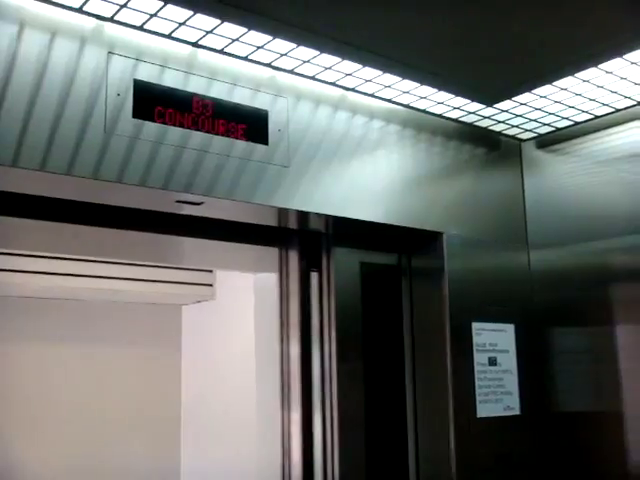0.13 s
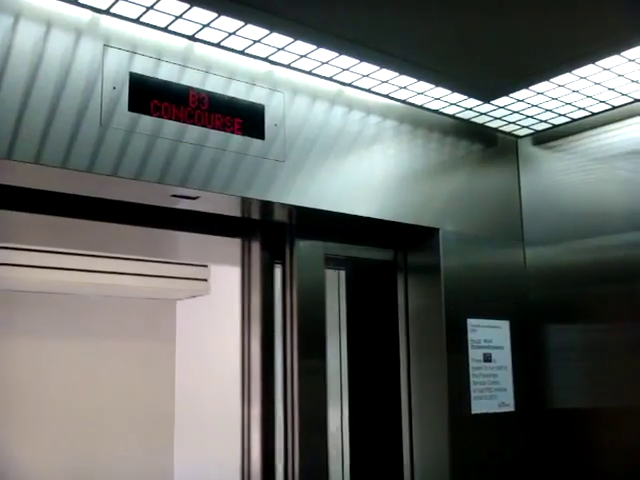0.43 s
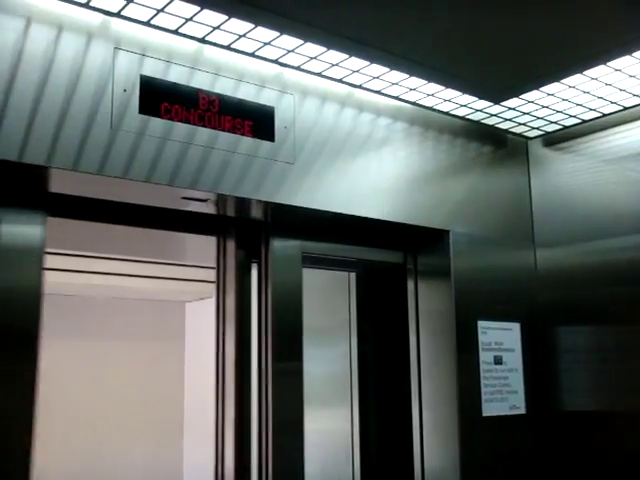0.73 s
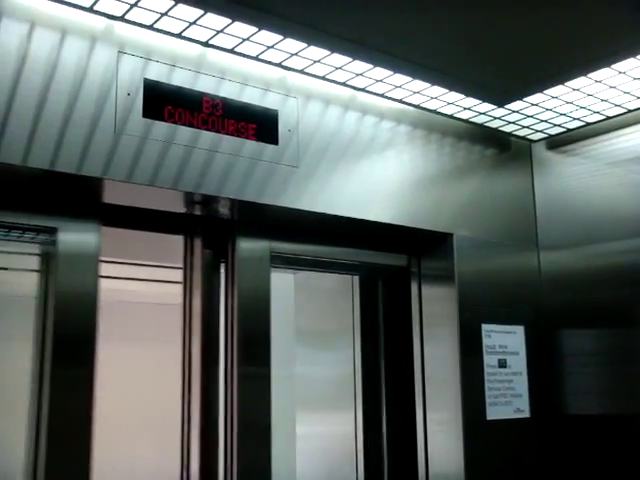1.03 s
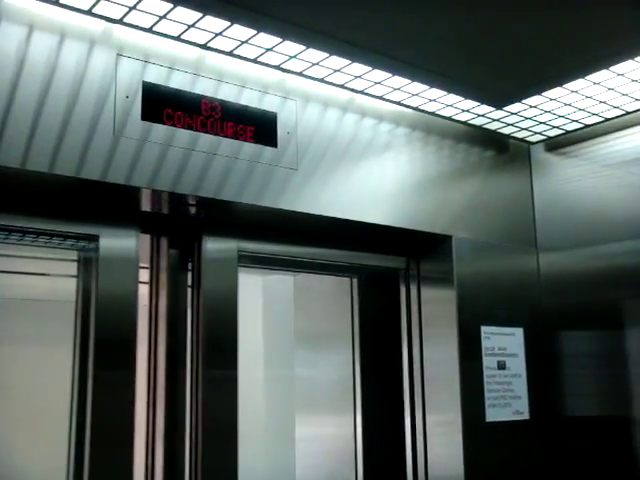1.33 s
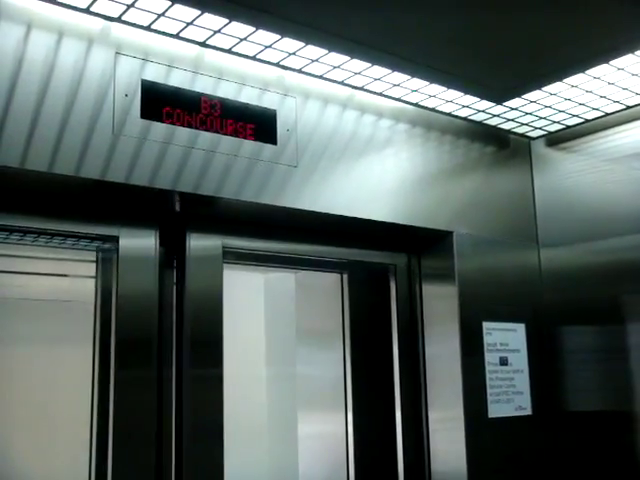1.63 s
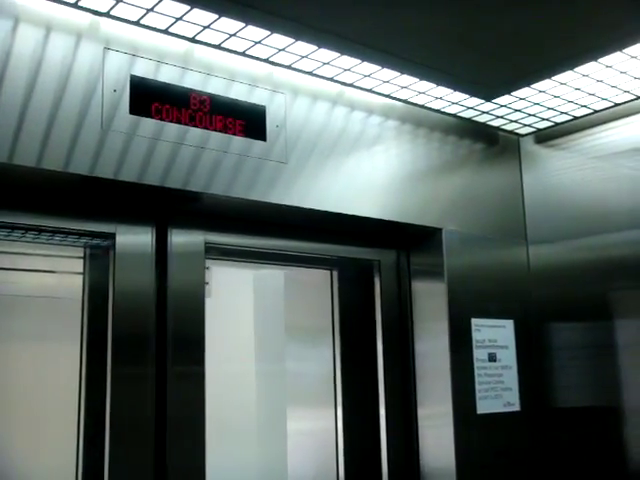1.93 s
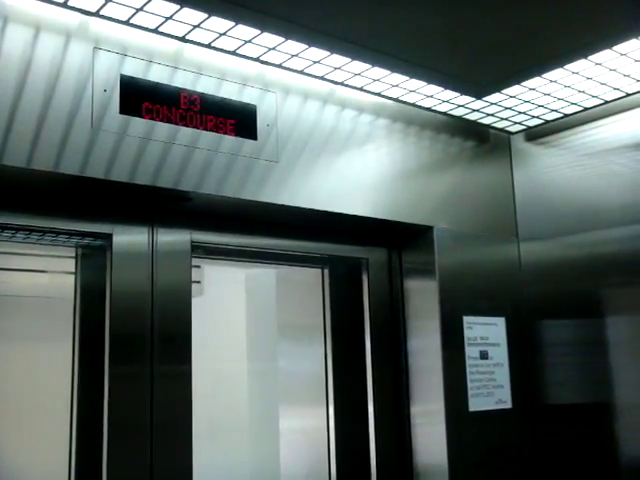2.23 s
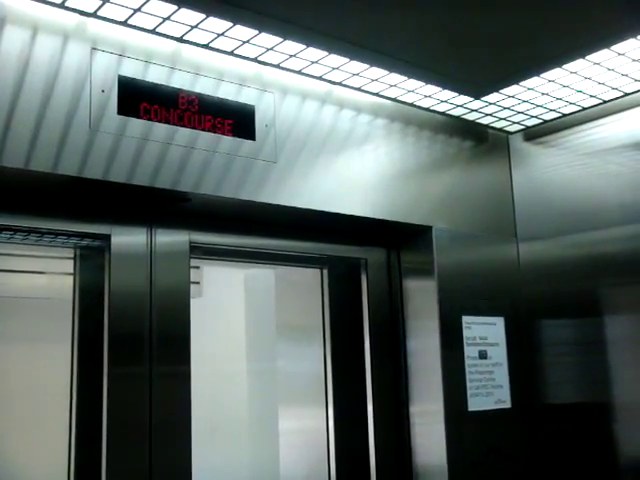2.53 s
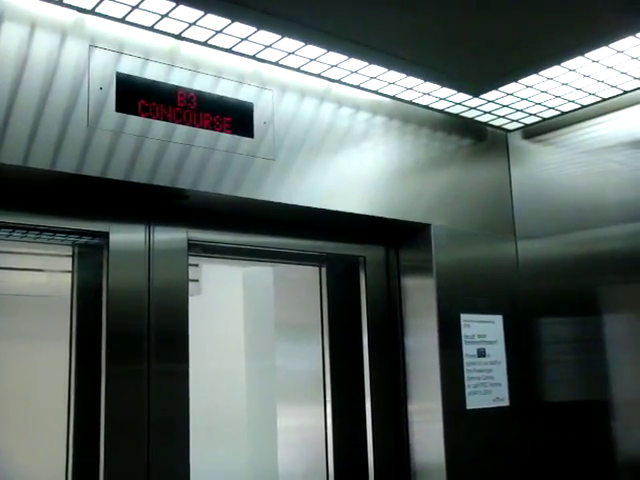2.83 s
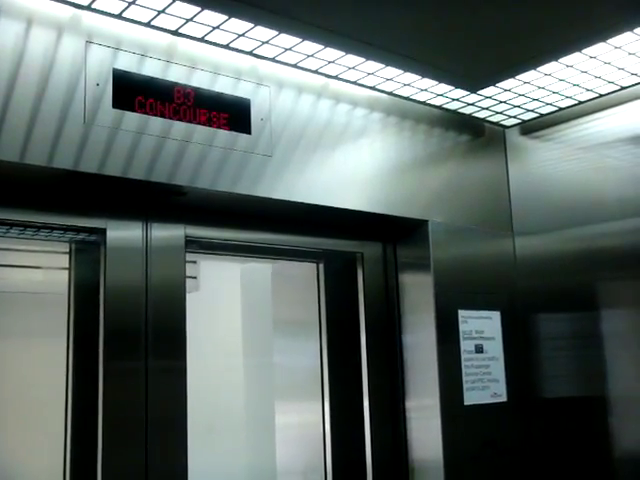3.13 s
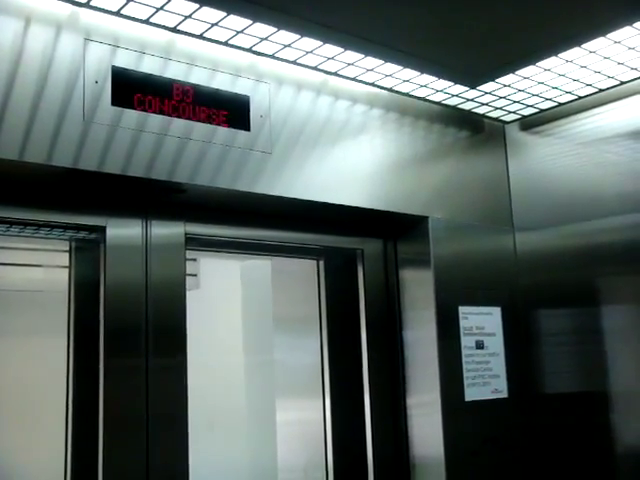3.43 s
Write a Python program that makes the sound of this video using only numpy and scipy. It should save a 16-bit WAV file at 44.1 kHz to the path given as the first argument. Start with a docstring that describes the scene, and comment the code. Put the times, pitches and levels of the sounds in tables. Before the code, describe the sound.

Glass elevator doors roll shut, heard from inside a small steel car, with roller noise, a faint motor whine and low rumble fading as they slow. Levers clack at about 1.2 seconds. The doors meet with a sharp ringing knock near 1.7, then their rubber edges groan briefly, leaving a panel ringing. The lock clunks at 2.2 and a soft bump follows. A ceiling fan rushes and hums throughout.

```python
"""Glass doors roll shut in a small steel lift car and meet with a ringing knock.
Their rubber edges groan in stick-slip as they are pressed together, setting a panel ringing.
The door gear clatters and the lock drops in. Roller noise and drive whine fade as the doors slow,
and the floor booms. Behind it all, the rush and hum of the ceiling fan."""
import sys
import numpy as np
from scipy import signal
from scipy.fft import rfft, irfft, next_fast_len
from scipy.io import wavfile

SR = 44100
rng = np.random.default_rng(int(sys.argv[2]) if len(sys.argv) > 2 else 0)


def generate_wav(signal):
    """Clip the signal to [-1, 1] and save it as 16-bit WAV at the path in sys.argv[1]."""
    frames = np.transpose(np.atleast_2d(signal))
    scaled = np.clip(frames, -1, 1) * 32767
    pcm = np.round(scaled).astype(np.int16)
    wavfile.write(sys.argv[1], SR, pcm)


N = 157437
T = np.arange(N) / SR
CUTOFF_HZ = 10050

# leaf impacts: t/s, relative level/dB, rise/s
KNOCK_HITS = [(1.663, -10, 0.0017), (1.683, -24.5, 0.0018)]
# impact spectrum: f/Hz, relative level/dB
KNOCK_SPECTRUM = [(300, -24), (600, -12.5), (900, -6), (1250, -9), (1650, -1.5), (2300, -7), (3200, -8),
                  (4400, -14), (7000, -23.5), (10000, -34)]
# door frame modes: f/Hz, relative level/dB
FRAME_MODES = [(1394, -29), (1540, -45), (1600, -25), (1646, -23.5), (1818, -45), (2015, -29), (2051, -41),
               (2301, -31.5), (2808, -28.5), (3142, -28), (3245, -28), (3545, -31), (3790, -33)]


def door_knock(crack_hz=1710, crack_db=-7, crack_s=0.0047, frame_gain_db=12):
    """The leaves meet: a short hard crack, then frame and car ring on."""
    onset_s = KNOCK_HITS[0][0]
    age = np.maximum(T - onset_s, 0)
    swell = (age / crack_s) * np.exp((1 - (age / crack_s) ** 2) / 2)
    crack = from_db(crack_db) * swell * np.sin(2 * np.pi * crack_hz * age)
    frame = sum(from_db(db + frame_gain_db) * ring(onset_s, hz, t60_s=0.21, rise_s=0.002)
                for hz, db in FRAME_MODES)
    impact = contacts(KNOCK_HITS, KNOCK_SPECTRUM, t60_scale=1, direct_db=-8, direct_t60_s=0.054)
    return crack + frame + from_db(-1) * impact


# rubber slip curve: t/s, slip rate/Hz, level/dB, roughness/0-1
SLIP_CURVE = [(1.78, 440.2, -44, .8), (1.812, 392.6, -19, 0.77), (1.85, 341.4, -25.5, 0.65),
              (1.89, 314.2, -23, 0.3), (1.96, 331.6, -26, 0.4), (2.02, 315, -27, 0.45),
              (2.12, 323.5, -33, 0.4), (2.25, 320, -62, 0.52)]
# panel jolts where the rub catches: t/s, level/dB
PANEL_JOLTS = [(1.817, -15), (1.851, -9), (1.879, -13), (1.892, -33), (1.925, -19), (1.944, -30),
               (1.98, -17)]
# door panel modes: f/Hz, level/dB, t60/s
PANEL_MODES = [(343, -25, 1.8), (376, -23, 1.03), (464.4, -20.5, 0.52), (552, -31.5, 2.2),
               (683, -25.5, 0.56)]


def rubber_groan(wobble=0.019, overtone_db=-11.5, judder_hz=31):
    """Pressed rubber edges stick and slip, sink in pitch and leave the door panel ringing."""
    slip_hz, level_db, roughness = in_time(SLIP_CURVE)
    phase = 2 * np.pi * np.cumsum(slip_hz * (1 + wobble * resonance(0, 35))) / SR
    # complex noise shakes both amplitude and phase
    judder = (resonance(0, judder_hz) + 1j * resonance(0, judder_hz)) / np.sqrt(2)
    grip = np.sqrt(1 - roughness ** 2) + roughness * judder
    partials = np.exp(1j * phase) + from_db(overtone_db) * np.exp(2j * phase)
    rub = from_db(level_db) * np.real(grip * partials) * (T > SLIP_CURVE[0][0])
    jolts = sum(from_db(db) * ring(t, hz=360, t60_s=0.035, rise_s=0.0029) for t, db in PANEL_JOLTS)
    panel = sum(from_db(db) * ring(1.83, hz, t60_s, rise_s=0.024) for hz, db, t60_s in PANEL_MODES)
    return rub + jolts + panel


# lever clacks, lock drop, panel bumps: t/s, level/dB, rise/s
CLACK_HITS = [(1.212, -21.5, 0.0074), (1.272, -20, 0.0072), (1.345, -37, .004)]
LOCK_HITS = [(2.1865, -14.5, 0.004)]
BUMP_HITS = [(.165, -27, 0.011), (1.275, -24, 0.008), (1.70, -22.5, 0.0079), (1.795, -22.5, 0.014),
             (2.205, -24.5, .01), (2.438, -24.5, 0.0062)]
# their spectra: f/Hz, relative level/dB
CLACK_SPECTRUM = [(250, -14), (400, 2.5), (650, -4), (1000, 5), (1250, -1.5), (1600, 2), (2400, -3.5),
                  (3400, -8.5), (4500, -10.5), (6500, -11), (8000, -14), (10000, -27)]
LOCK_SPECTRUM = [(170, -3), (400, -0.5), (700, -0.5), (1000, 1), (1500, -2.5), (2100, 2), (3400, -1.5),
                 (4800, -7), (6500, -7.5), (8000, -15), (10000, -24)]
BUMP_SPECTRUM = [(120, -15), (250, -6.5), (330, -2.5), (410, 1.5), (520, -5.5), (750, -11.5), (1200, -15.5),
                 (2500, -27), (8000, -55)]


def door_gear():
    """Levers clack, the lock drops in and panels bump dully, each exciting the car."""
    clacks = contacts(CLACK_HITS, CLACK_SPECTRUM, t60_scale=1, direct_db=2, direct_t60_s=0.032)
    lock = contacts(LOCK_HITS, LOCK_SPECTRUM, t60_scale=0.85, direct_db=3.5, direct_t60_s=0.026)
    bumps = contacts(BUMP_HITS, BUMP_SPECTRUM, t60_scale=0.71, direct_db=2.5, direct_t60_s=0.08)
    return clacks + lock + bumps


# catch ticks: t/s, level/dB, rise/s, centre f/Hz
CATCH_HITS = [(1.195, -28.5, 0.0044, 6600), (1.266, -29, 0.0039, 8100), (1.513, -41.5, 0.0063, 8040),
              (1.765, -27, .012, 8300), (2.13, -35.5, 0.0043, 7400)]


def catches():
    """Light catches tick, each a broad, bright band of decaying noise."""
    return sum(from_db(db) * strike(t, rise_s, t60_s=0.5) * resonance(hz, half_width_hz=3100)
               for t, db, rise_s, hz in CATCH_HITS)


# strikes on the lever: t/s, level/dB
LEVER_HITS = [(1.197, -28), (1.232, -37), (1.27, -40), (2.187, -30)]
# lever modes: f/Hz, half-width/Hz, relative level/dB
LEVER_MODES = [(5140, 90, 0), (6340, 130, 1), (7630, 55, -4.5), (8400, 180, -5.5)]


def lever_ring():
    """A struck steel lever rings in narrow, high resonances."""
    modes = sum(from_db(db) * resonance(hz, half_width_hz) for hz, half_width_hz, db in LEVER_MODES)
    envelope = sum(from_db(db) * strike(t, rise_s=0.0036, t60_s=0.25) for t, db in LEVER_HITS)
    return envelope * modes


# rolling level curve: t/s, level/dB
ROLL_CURVE = [(0, -23.5), (.15, -24), (.5, -25.5), (.9, -27), (1.15, -28), (1.55, -33.5), (2.05, -35.5),
              (2.4, -47), (2.7, -65)]
# track spectrum: f/Hz, relative level/dB
TRACK_SPECTRUM = [(60, -5.5), (95, -8.5), (132, 4), (200, -21), (400, -10), (700, -2.5), (1080, 1.5),
                  (1300, -1), (2800, -7), (4300, -10), (5400, -11.5), (6200, -17.5), (10000, -28)]
# drive whine: f/Hz, half-width/Hz, level/dB re track
WHINE_BANDS = [(514, 9.4, -8), (575, 58, -28), (947, 28, -18.5), (1030, 14, -12.5), (1050, 20, -19),
               (1976, 60, -15.5), (5420, 50, -23)]


def rollers_and_drive(uneven_db=0.66, uneven_hz=25):
    """Rollers on the track and the whining drive fade together as the doors slow."""
    level_db, = in_time(ROLL_CURVE)
    track = coloured(TRACK_SPECTRUM) * from_db(uneven_db * resonance(0, uneven_hz))
    whine = sum(from_db(db) * resonance(hz, half_width_hz) for hz, half_width_hz, db in WHINE_BANDS)
    return from_db(level_db) * (track + whine)


# floor boom curve: t/s, level/dB
BOOM_CURVE = [(0, -37), (.19, -30), (.33, -38), (.55, -37.5), (.75, -34), (.92, -39), (1.1, -44),
              (1.28, -48), (1.36, -30.5), (1.5, -44), (2.22, -46), (2.37, -32.5), (2.55, -42), (3.5, -48)]


def floor_boom(mode_hz=31.5, wander_hz=2.12, waver=0.15):
    """The moving doors excite the car's lowest mode, which wanders in pitch and strength."""
    level_db, = in_time(BOOM_CURVE)
    hz = mode_hz + wander_hz * resonance(0, 4.1)
    strength = 1 + waver * resonance(0, 5.5)
    phase = 2 * np.pi * np.cumsum(hz) / SR
    return from_db(level_db) * unit_rms(strength * np.sin(phase))


# air rush spectrum, duct resonances: f/Hz, relative level/dB
FAN_SPECTRUM = [(22, -12), (45, -3.5), (75, -9.5), (90, -6), (125, 0), (160, -6), (215, -9.5), (290, -10),
                (400, -5), (451, -7.5), (554, -7.5), (753, -5), (813, -9.5), (1000, -9.5), (1110, -7.5),
                (1230, -15), (1400, -12), (1700, -14.5), (1900, -17.5), (2600, -20), (3000, -19),
                (3900, -25.5), (5300, -28.5), (7500, -35.5), (10000, -42)]
DUCT_MODES = [(71, -44.5), (107.7, -44), (177.6, -48), (253, -50), (409, -48.5), (498, -42), (545, -42),
              (560, -45.5), (603, -44), (985, -43)]


def ceiling_fan(rush_db=-28, hum_gain_db=1):
    """Steady rush of air with humming duct resonances."""
    hum = sum(from_db(db + hum_gain_db) * resonance(hz, half_width_hz=5) for hz, db in DUCT_MODES)
    return from_db(rush_db) * coloured(FAN_SPECTRUM) + hum


# car reverberation: f/Hz, t60/s
CAR_DECAY = [(200, 0.5), (700, 0.67), (1700, 0.71), (3500, 0.8), (7000, 0.62), (10000, 0.9)]


def contacts(hits, spectrum, t60_scale, direct_db, direct_t60_s):
    """Each hit is a short direct burst plus a wash of steel panels and car, dying band by band."""
    edges_hz = [0, 500, 1200, 2500, 5000, SR / 2]
    size = next_fast_len(N, real=True)
    hz = np.fft.rfftfreq(size, 1 / SR)
    bins = rfft(coloured(spectrum), size)
    wash = 0
    for low, high in zip(edges_hz, edges_hz[1:]):
        centre_hz = min(low + high, 3 * low + 600) / 2
        t60_s = t60_scale * at_hz(CAR_DECAY, centre_hz)
        power = sum((from_db(db) * strike(t, rise_s, t60_s)) ** 2 for t, db, rise_s in hits)
        band = irfft(bins * (hz >= low) * (hz < high), size)[:N]
        wash = wash + np.sqrt(power) * band
    burst = sum(from_db(db + direct_db) * strike(t, rise_s / 2, direct_t60_s) for t, db, rise_s in hits)
    return wash + burst * coloured(spectrum)


def strike(onset_s, rise_s, t60_s):
    """Envelope: linear rise, exponential decay."""
    age = np.maximum(T - onset_s, 0)
    return np.minimum(age / rise_s, 1) * from_db(-60 * age / t60_s)


def ring(onset_s, hz, t60_s, rise_s):
    """One struck mode, random phase."""
    return strike(onset_s, rise_s, t60_s) * np.sin(2 * np.pi * (hz * T + rng.random()))


def noise(gain_at):
    """Unit-rms noise with amplitude spectrum gain_at(hz)."""
    size = next_fast_len(N, real=True)
    hz = np.fft.rfftfreq(size, 1 / SR)
    white = rfft(rng.standard_normal(size))
    return unit_rms(irfft(white * gain_at(hz), size)[:N])


def coloured(spectrum):
    """Noise of a tabulated spectrum, rolled off below it and band-limited above."""
    def gain_at(hz):
        bass_rolloff = np.minimum(hz / spectrum[0][0], 1) ** 2
        return from_db(at_hz(spectrum, hz)) * bass_rolloff * (hz < CUTOFF_HZ + 500)
    return noise(gain_at)


def resonance(hz, half_width_hz):
    """Noise-driven resonance; at 0 Hz, a slow random drift."""
    return noise(lambda f: 1 / (1 + ((f - hz) / half_width_hz) ** 2))


def in_time(curve):
    """Each value column of a curve at every sample."""
    times_s, *columns = np.transpose(curve)
    return [np.interp(T, times_s, column) for column in columns]


def at_hz(table, hz):
    """Interpolate on a log-frequency axis."""
    table_hz, values = np.transpose(table)
    return np.interp(np.log(hz + 1e-3), np.log(table_hz), values)


def from_db(db):
    """Decibels to gain."""
    return 10 ** (np.asarray(db) / 20)


def unit_rms(x):
    """Scale to rms 1."""
    return x / np.sqrt(np.mean(x ** 2) + 1e-20)


def scene():
    """Mono mix, heard from the middle of the car."""
    background = ceiling_fan() + rollers_and_drive() + floor_boom()
    closing = door_knock() + rubber_groan() + door_gear() + catches() + lever_ring()
    return (closing + background)[None]


def record(dry):
    """40 ms of silence, 4 ms fade-in, peak clipping, steep low-pass."""
    fade_in = np.clip((T - 0.04) / 0.004, 0, 1)
    clipped = np.clip(dry * fade_in, -0.8, 0.8)
    low_pass = signal.ellip(14, 0.1, 100, CUTOFF_HZ, fs=SR, output="sos")
    return signal.sosfilt(low_pass, clipped)


dry = scene()
out = record(dry)
generate_wav(out)
```